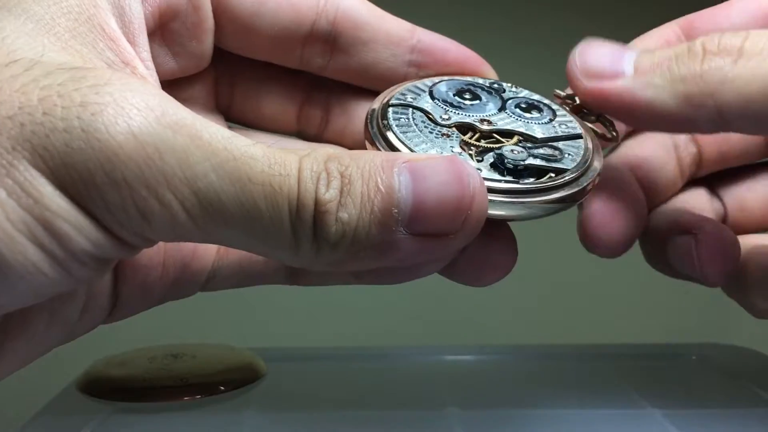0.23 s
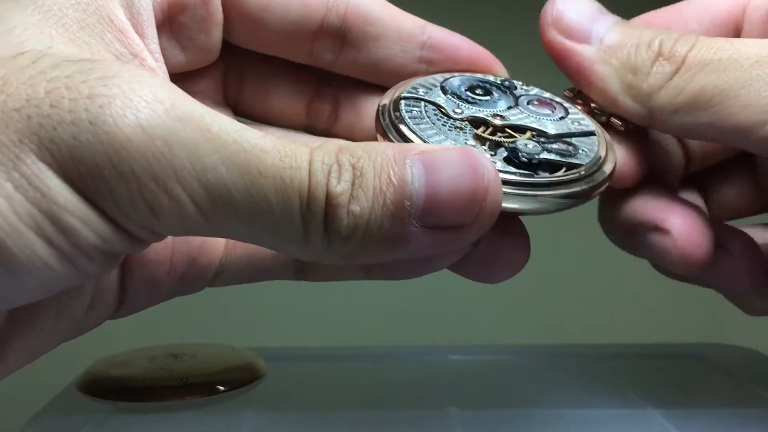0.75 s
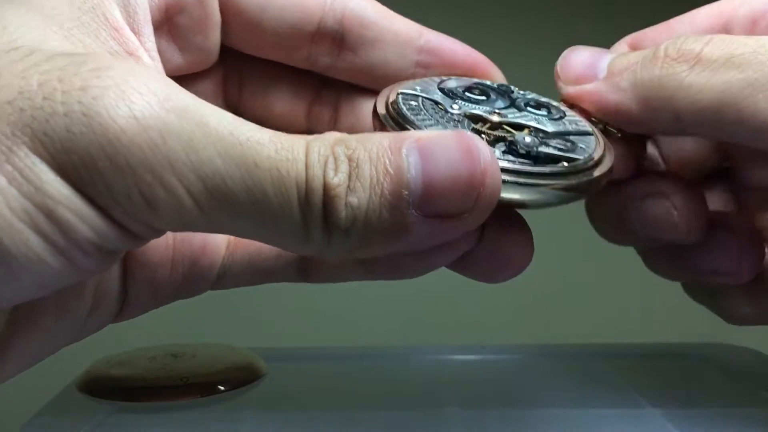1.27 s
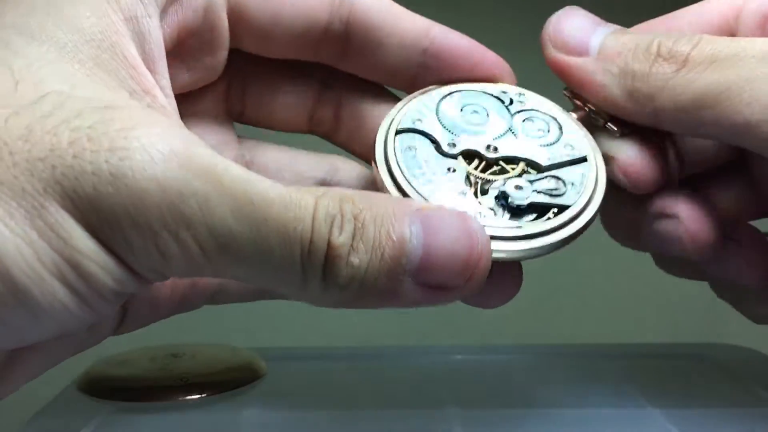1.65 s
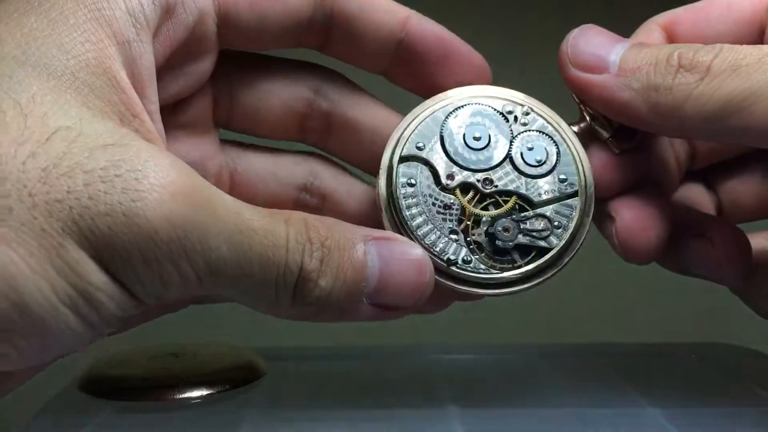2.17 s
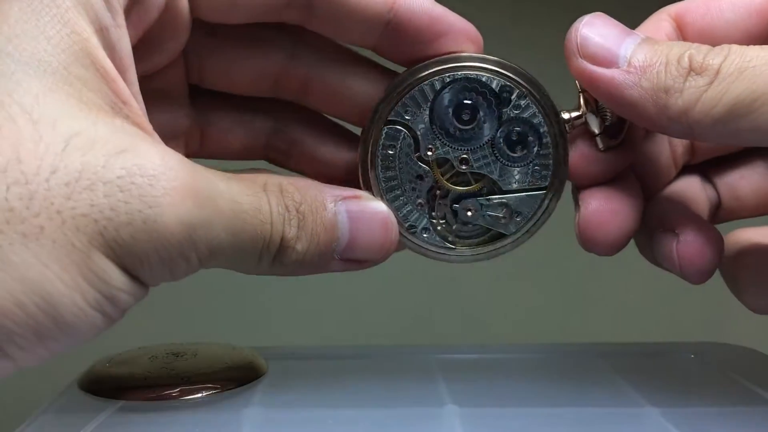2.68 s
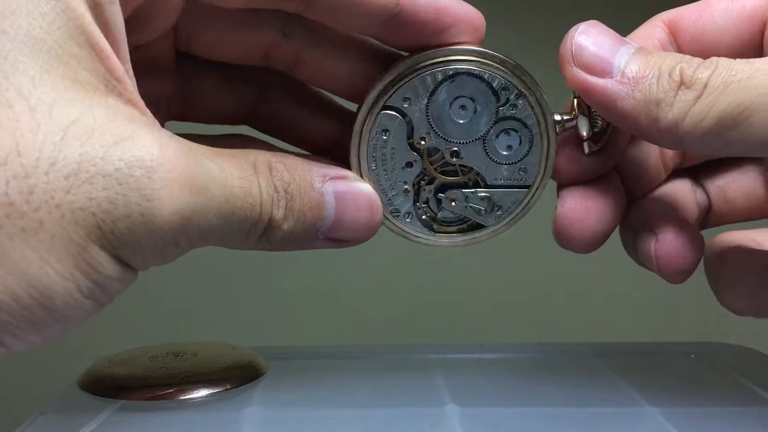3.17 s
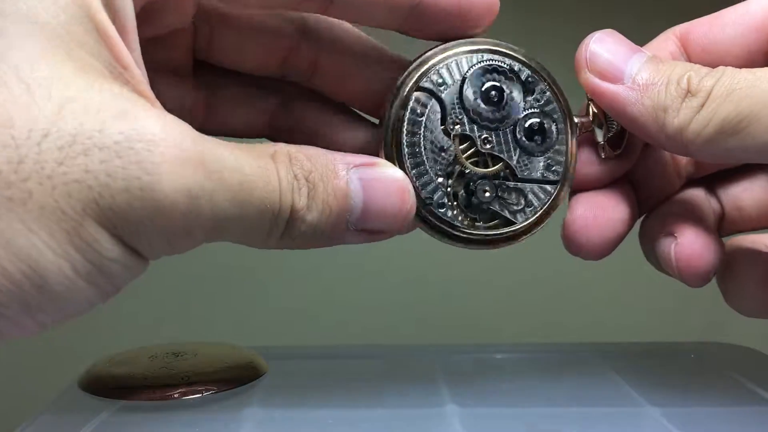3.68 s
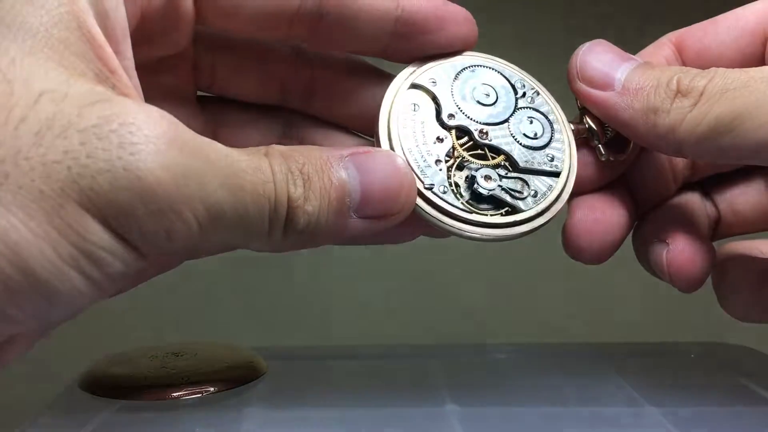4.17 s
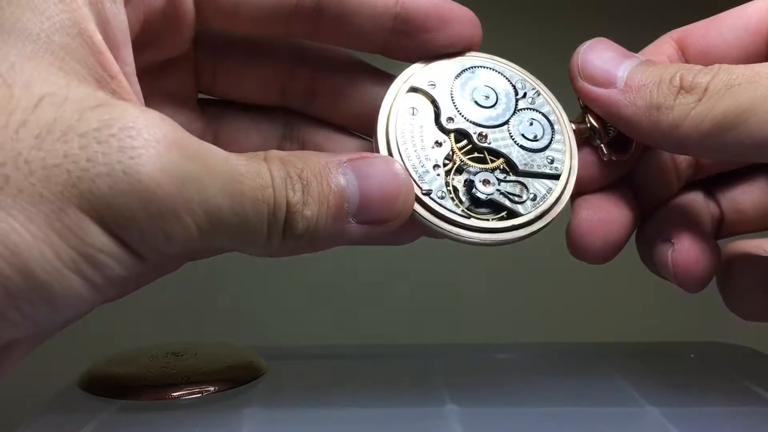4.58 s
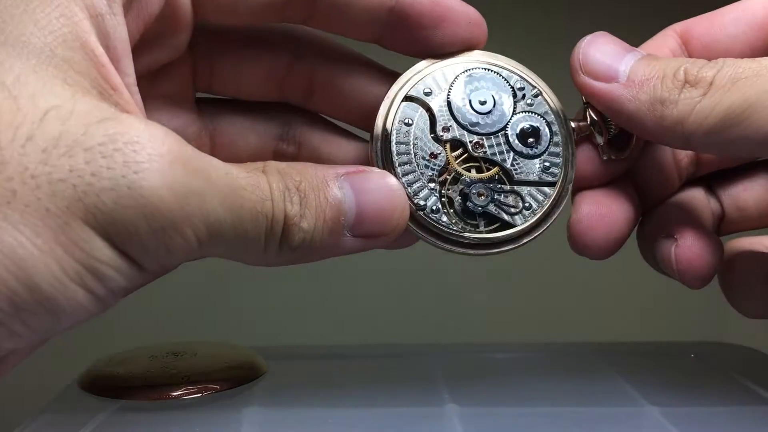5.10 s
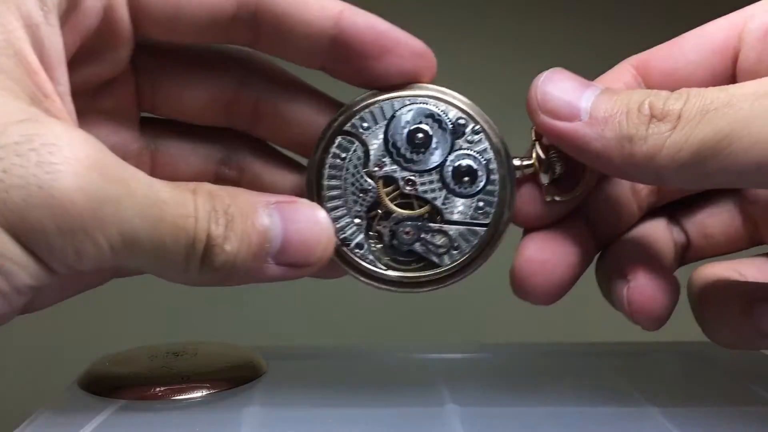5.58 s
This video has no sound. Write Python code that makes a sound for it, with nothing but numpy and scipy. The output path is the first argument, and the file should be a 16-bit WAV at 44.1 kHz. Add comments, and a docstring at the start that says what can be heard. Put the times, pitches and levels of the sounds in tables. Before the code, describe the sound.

A mechanical watch held near the microphone: a few clicks at the start, a six-tooth-long ratchet burst at half a second, light clinks of the loose bow around one second, a longer, denser zip of clicks at about 1.3 seconds. Then steady thin ticking, about five and a half a second, over soft indoor rumble and intermittent hiss.

```python
"""In a quiet room, close to the microphone, an open pocket watch is wound and turned in the hands.
Three crown turns snap a pawl over ratchet teeth; the escapement beats 5.5 times a second.
Struck metal is summed damped modes plus a noise crack; a loose bow clinks, wheels sing on.
Skin rubs in noise grains and slips in dull ticks. Behind: filtered-noise room tone, hum, whine, gated hiss."""
import sys
import numpy as np
from scipy import signal
from scipy.fft import rfft, irfft
from scipy.io import wavfile
from scipy.ndimage import uniform_filter1d

SR = 44100
rng = np.random.default_rng(int(sys.argv[2]) if len(sys.argv) > 2 else 0)


def waveform_to_disk(signal):
    """Save audio, clipped to [-1, 1], as 16-bit WAV at the path in sys.argv[1]."""
    frames = np.transpose(np.atleast_2d(signal))
    scaled = np.clip(frames, -1, 1) * 32767
    samples = np.round(scaled).astype(np.int16)
    wavfile.write(sys.argv[1], SR, samples)


N = 257544

# Crown turns, even speed between points:
# t/s, ratchet teeth passed, click level/dB before trim, brightness/dB, finger rub/dB
SHORT_TURN = [(.0162, 0, -34.5, 0, -58.5), (.0638, 2, -32.5, .5, -62)]
STEADY_TURN = [(0.5189, 0, -32, 0.5, -64), (.539, 1, -32, 0.5, -66.5), (.575, 3, -31.3, 2, -58),
               (.6158, 5, -31.5, 1, -63), (0.631, 6, -34, 0, -63), (.689, 9, -34.5, -2.5, -57)]
LAST_TURN = [(1.269, 0, -33, .5, -67), (1.289, 1, -32, 0.15, -58), (1.358, 5, -33.5, -1.7, -63),
             (1.4064, 7, -34.5, -2.2, -55.5), (1.5025, 11, -34.5, -.5, -60), (1.5356, 12, -32, 1.3, -61)]
# Modes of plates and case:
# f/Hz, level/dB under first turns, level/dB under last turn, level/dB under escapement, level/dB under bow
WATCH_MODES = [(1000,-23.5,-25,-32.5,-20), (1867,-19.5,-14,-22.5,-1), (2432,-21.5,-22,-23.5,-5),
               (2974,-16,-13.5,-24.5,-13), (3430,-19.5,-14.5,-20,-3), (3804,-15.5,-15.5,-17,-11.5),
               (4260,-19.5,-8.5,-20,-7), (4550,-8.5,-15.5,-14,-27), (5030,-10.5,-17,-22,-11.5),
               (5450,-10.5,-7.5,-13.5,-1), (5910,-8.5,-12,-12,-3), (6450,-21,-9.5,-9.5,0),
               (6900,-13,-6,-9.5,-6.5), (7520,-22,-8.5,-11.5,0), (8165,-2,-5.5,-8,0.5),
               (8550,3.5,-1.5,-15.5,-12), (8760,-0.5,-13,-7,6), (9300,-3,-3,-4.5,-1.5),
               (9770,-6,-5.5,-12.5,-1.5), (10220,-6,-14,-12,-3), (10870,-7,-6,-16,-8),
               (11480,-4,-3,-8.5,-1.5), (11980,-2.5,1,-8,-4), (12330,-10,0,4,-10.5), (12960,0,3.5,3.5,1),
               (13370,6.5,-8,-3,-7), (14000,-9,-0.5,-5,-4.5), (14680,-7,-4.5,-18,-2.5),
               (14500,-8,-2,-24,-10), (15430,-2.5,3.5,-5,-17)]
# Lightly damped steel wheels: f/Hz, t60/s, gain at resonance/dB before send
WHEEL_MODES = [(4270, 0.045, 0), (8100, 0.05, -6), (12700, 0.041, -11), (12790, 0.046, -11)]
# Skin on the knurled crown, dull rub and fine creak: f/Hz, level/dB
RUB_SPECTRUM = [(80, -30), (180, 7.5), (380, -2), (700, -16), (1400, -10), (1750, -10.5), (2000, 0.5),
                (2250, -7), (2700, -18.5), (6000, -28)]
# Uneven balance as the watch is tilted: t/s, lag/ms, limp/ms (delays ticks, hastens tocks)
BALANCE_DRIFT = [(.35, -5.5, 4.5), (.75, 1, -1), (2.0, .8, 0.6), (2.4, -.7, -0.5), (2.8, -.6, 1.5),
                 (3.28, 3.5, 0), (3.7, -2.8, 0), (4.2, -0.7, 0.2), (4.7, -2.5, 1.1), (5.1, -3, 2.2),
                 (5.66, -4.5, 3.5)]
# Escapement as the watch is turned about:
# t/s, beat level/dB before trim, touch level/dB before trim, brightness/dB
TICKING = [(.22, -52.5, -64, -21), (.8, -57.5, -64, -7), (1.65, -57, -67, -6), (1.9, -51.5, -62, -1),
           (2.35, -50.5, -64, 0), (2.65, -51.5, -59.5, -2), (3.1, -54, -59.5, -3), (3.7, -53.5, -61.5, -1),
           (4.25, -51.5, -62, 1), (4.8, -52, -59, 1), (5.7, -50.5, -59, 4.5)]
# Ping on the ticks as the watch is tilted: t/s, level/dB
PING = [(3.4, -19), (3.7, 8), (4.4, 4), (5.3, -20)]
# Bow and crown knocking under the fingers: t/s, level/dB, brightness/dB, body/dB
CLINKS = [(0.323, -44, 5.5, -3.5), (0.4147, -42.5, 6.5, -5.5), (0.4604, -35, 7.5, -6),
          (0.8399, -44, 3.5, 3), (0.8798, -57, -11, 9), (1.0053, -48.5, 3.5, -3), (1.0998, -45.5, -2, -1)]
# Fingertip slipping on the case: t/s, f/Hz, level/dB
SLIPS = [(.054, 1910, -52), (.2125, 1960, -60.5), (.2995, 1980, -57), (0.389, 1710, -54), (.395, 1430, -52),
         (0.8391, 900, -52), (1.101, 1530, -53.5), (1.153, 730, -63), (1.262, 940, -59.5),
         (1.314, 1090, -56.5), (1.485, 2070, -57), (1.491, 1000, -58.5)]
# Room rumble, air and microphone hiss: f/Hz, mean density/dB per Hz
ROOM_TONE = [(20, -97), (38, -89), (52, -79), (63, -72.5), (80, -81.5), (105, -81.5), (145, -80.5),
             (180, -88.5), (245, -96), (350, -98.5), (600, -105), (1400, -110.3), (3000, -115.8),
             (8000, -119), (15000, -124.2)]
# Mains hum: f/Hz, level/dB about which it wavers
HUM = [(61, -65), (120, -62)]
# Faint whine swelling and dying away: peak t/s, level/dB
WHINES = [(.73, -67.5), (2.88, -75.5), (5.84, -81)]
# Microphone hiss let through by the gate: f/Hz, density/dB per Hz before trim
HISS = [(100, -112), (300, -94), (600, -99.5), (1100, -102.0), (2000, -103.0), (4000, -104.0),
        (6000, -105.1), (9000, -107.9), (12500, -109.7), (14000, -111.1)]
# Colour of the wall reflections, and rumble share of the room tone: f/Hz, gain/dB
WALL_COLOUR = [(300, -1.5), (2000, 2.0), (5000, 3.5), (9000, -1), (15000, -0.5)]
RUMBLE_SHARE = [(300, 0), (1200, -20)]

# Columns of WATCH_MODES by place struck
FIRST_GRIP, LAST_GRIP, PALLET, BOW = 1, 2, 3, 4
GRAZE_S = .0012
WINDING_TRIM_DB, TICKING_TRIM_DB, HISS_TRIM_DB = 0.8, -0.85, -0.6
RUB_RISE_DB_PER_S, RUB_FALL_DB_PER_S = 502, 252
RESTING_RUB_DB, LET_GO_S = -73.5, 1.9  # fingers stay lightly on the crown until they let go
FIRST_BEAT_S, BEAT_S = .0437, .18135
TICK_LEAD_S, TOCK_LEAD_S = .056, .0477  # unlocking touch before the beat
ACCENT_DB_PER_MS = 0.54  # with limp, ticks gain and tocks lose level
TICK_BRIGHT_DB, TOUCH_BRIGHT_DB = 2.5, -5  # ticks +, tocks -; touches duller still
UPRIGHT_START_S, UPRIGHT_END_S = 2.85, 3.75
IMPULSE_LEAD_S, IMPULSE_PRETRIM_DB = .017, -69
PING_HZ = 8150
WHINE_HZ, WHINE_RISE_DB_PER_S, WHINE_FALL_DB_PER_S = 1326, 170, 65
GATE_OPEN_DB, GATE_HOLD_S, TOP_HZ = -38.5, .405, 15900


def winding():
    """The spring-loaded pawl snaps over the ratchet teeth."""
    first = blows(teeth(SHORT_TURN) + teeth(STEADY_TURN), drive=FIRST_GRIP,
                  ring_t60_s=0.012, crack_db=-0.5, crack_t60_s=0.0091,
                  rebound_db=-5, rebound_s=.0012, scatter_db=5)
    last = blows(teeth(LAST_TURN), drive=LAST_GRIP,
                 ring_t60_s=0.011, crack_db=0.0, crack_t60_s=0.011,
                 rebound_db=-5.0, rebound_s=0.0015, scatter_db=3.5)
    return undb(WINDING_TRIM_DB) * (first + last)


def teeth(turn):
    """One click (t/s, level/dB, brightness/dB) per tooth passing the pawl."""
    s, passed, db, bright_db, _ = np.transpose(turn)
    passed = np.round(passed)
    return [[np.interp(tooth, passed, column) for column in (s, db, bright_db)]
            for tooth in np.arange(passed[-1] + 1)]


def rubbing():
    """Skin sticks and slips on the crown in dense, uneven grains: follows each turn, rests lightly between."""
    t = np.arange(N) / SR
    grip = undb(RESTING_RUB_DB + swell(t, 0, LET_GO_S, RUB_RISE_DB_PER_S, RUB_FALL_DB_PER_S))
    for turn in (SHORT_TURN, STEADY_TURN, LAST_TURN):
        envelope_db = swell(t, turn[0][0], turn[-1][0], RUB_RISE_DB_PER_S, RUB_FALL_DB_PER_S)
        grip = np.maximum(grip, undb(follow(turn, t)[-1] + envelope_db))
    struck = rng.random(N) < 1200 / SR  # 1200 grains/s
    grains = struck * rng.standard_normal(N) * undb(4.1 * walk(70))
    return unit(colour(grains, RUB_SPECTRUM)) * grip


def escapement():
    """Each balance swing: light rattling touch, then a sharper beat as the escape wheel lands on a pallet."""
    touch_rows, beat_rows = swings()
    touches = blows(touch_rows, drive=PALLET, ring_t60_s=0.0046, crack_db=-11.5, crack_t60_s=0.0074,
                    rebound_db=1.0, rebound_s=.0015, scatter_db=6.0)
    beats = blows(beat_rows, drive=PALLET, ring_t60_s=0.017, crack_db=-4.5, crack_t60_s=0.0051,
                  rebound_db=-5.5, rebound_s=.0013, scatter_db=2)
    ticks = undb(TICKING_TRIM_DB) * (touches + beats)
    ping = colour(ticks, peak(PING_HZ, inner=1.05, outer=1.2))
    return ticks + ping * undb(follow(PING, np.arange(N) / SR)[0])


def swings():
    """The balance swings to and fro: touches and beats as (t/s, level/dB, brightness/dB)."""
    due = np.arange(FIRST_BEAT_S, N / SR + BEAT_S, BEAT_S)
    side = np.where(np.arange(len(due)) % 2, 1, -1)  # tick +1, tock -1
    lag_ms, limp_ms = follow(BALANCE_DRIFT, due)
    beat_db, touch_db, bright_db = follow(TICKING, due)
    lands = due + (lag_ms + side * limp_ms) / 1000
    unlocks = lands - np.where(side > 0, TICK_LEAD_S, TOCK_LEAD_S)
    accent_db = side * limp_ms * ACCENT_DB_PER_MS
    touches = np.column_stack([unlocks, touch_db + accent_db, bright_db + TOUCH_BRIGHT_DB])
    touches = touches[unlocks > GRAZE_S]
    # watch held upright: the fork clicks once more just before each tock
    impulses = [(s - IMPULSE_LEAD_S, IMPULSE_PRETRIM_DB, 0) for s in lands[side < 0]
                if UPRIGHT_START_S < s < UPRIGHT_END_S]
    beats = np.column_stack([lands, beat_db + accent_db, bright_db + side * TICK_BRIGHT_DB])
    return [*touches, *impulses], beats[due < N / SR]


def handling():
    """The loose bow clinks on the pendant; skin slips on the case with soft, dull ticks."""
    clinks = blows(CLINKS, drive=BOW, ring_t60_s=0.0051, crack_db=0.0, crack_t60_s=0.024,
                   rebound_db=-8.5, rebound_s=0.0014, scatter_db=3.0)
    slips, t = np.zeros(N), np.arange(SR // 30) / SR
    for s, hz, db in SLIPS:
        # soft flesh gives no treble
        flesh = [(hz / 4, -40), (hz / 2, -15), (hz, 0), (hz * 2, -18), (hz * 4, -55)]
        skin = colour(rng.standard_normal(len(t)), flesh)
        slip = np.sin(2 * np.pi * hz * t) + 1.68 * unit(skin)
        add(slips, s, slip * fade(t, 0.019) * np.minimum(t / 0.00071, 1), db)
    return clinks + slips


def blows(rows, **contact):
    """Clicks from a table; a harder contact is brighter, a heavier one has more body."""
    out = np.zeros(N)
    phase = rng.random(len(WATCH_MODES))
    for s, db, bright_db, *body in rows:
        body_db = sum(body)  # 0 if no body column
        tone = [(800, 0), (1600, body_db), (2800, body_db), (4200, 0), (9500, 0), (12000, bright_db)]
        add(out, s - GRAZE_S, colour(click(phase=phase, **contact), tone), db)
    return out


def click(drive, ring_t60_s, crack_db, crack_t60_s, rebound_db, rebound_s, scatter_db, phase):
    """Steel grazes, hits, rebounds twice; each contact rings the modes and a dense, quickly damped crack."""
    columns = np.transpose(WATCH_MODES)
    hz, db = columns[0], columns[drive]
    t = np.arange(SR // 30) / SR - GRAZE_S  # main hit at t = 0
    t60 = ring_t60_s * (9000 / hz[:, None]) ** 0.42  # high modes die sooner
    spectrum = [(300, db[0] - 7.5), *zip(hz, db)]  # so small a body radiates little bass
    # delay/s, force/dB
    contacts = [(-GRAZE_S, -22), (0, 0),
                (rebound_s * rng.uniform(0.622, 1.3), rebound_db),
                (rebound_s * rng.uniform(2.1, 2.6), 2 * rebound_db)]
    out = 0
    for delay, force_db in contacts:
        age = t - delay
        sizes = undb(db + scatter_db * rng.standard_normal(len(hz)))[:, None] / np.sqrt(t60)
        # main hit lands on much the same spot, the others anywhere; phase in cycles
        offset = phase + (.16 if delay == 0 else 1) * rng.standard_normal(len(hz))
        waves = np.sin(2 * np.pi * (hz[:, None] * age + offset[:, None]))
        ring = np.sum(sizes * fade(age, t60) * waves, axis=0)
        crack = colour(rng.standard_normal(len(t)), spectrum) * fade(age, crack_t60_s)
        attack = np.clip(age / 0.0003, 0, 1)
        out = out + undb(force_db) * attack * (unit(ring) + undb(crack_db) * unit(crack))
    return out


def wheels(x):
    """Long, faint ring that blows wake in the wheels: damped sines scaled to their gain at resonance."""
    t = np.arange(SR // 5) / SR
    ring = 0
    for hz, t60, db in WHEEL_MODES:
        scale = undb(db) * 2 * np.log(1000) / (t60 * SR)
        ring = ring + scale * fade(t, t60) * np.sin(2 * np.pi * hz * t)
    return signal.fftconvolve(x, ring)[:N]


def room(x, tail_db, tail_t60_s, echo_db, echo_s):
    """Small room: scattered wall echo and short tail, as coloured decaying noise."""
    t = np.arange(SR // 2) / SR
    tail = rng.standard_normal(len(t)) * fade(t - .004, tail_t60_s)
    echo = rng.standard_normal(len(t)) * fade(t - echo_s, 0.016)
    response = (undb(tail_db) * unit(tail) + undb(echo_db) * unit(echo)) / np.sqrt(len(t))
    return signal.fftconvolve(x, colour(response, WALL_COLOUR))[:N]


def background():
    """Heaving low rumble under steady air, wavering mains hum and a faint, airy narrow-band whine."""
    t = np.arange(N) / SR
    hum = 0
    for hz, db in HUM:
        level = undb(db + 2.35 * walk(9)) * np.sqrt(2)
        hum = hum + level * np.sin(2 * np.pi * hz * t + 0.26 * walk(6))
    whine = unit(noise(peak(WHINE_HZ, inner=1.08, outer=1.25)))
    whine = whine * sum(undb(db + swell(t, s, s, WHINE_RISE_DB_PER_S, WHINE_FALL_DB_PER_S))
                        for s, db in WHINES)
    tone = noise(ROOM_TONE)
    rumble = colour(tone, RUMBLE_SHARE)
    air = tone - rumble
    return air + rumble * undb(1.43 * walk(4.9)) + hum + whine


def undb(db):
    """Decibels to gain."""
    return 10 ** (np.asarray(db) / 20)


def unit(x):
    """Scale to rms 1."""
    return x / np.sqrt(np.mean(x ** 2))


def colour(x, points):
    """Filter by (f/Hz, gain/dB) points, interpolated over log frequency."""
    hz, db = np.transpose(points)
    f = np.maximum(np.fft.rfftfreq(len(x), 1 / SR), 1)
    gain = undb(np.interp(np.log(f), np.log(hz), db))
    return irfft(rfft(x) * gain, len(x))


def peak(hz, inner, outer):
    """Band-pass points: -5 dB at the inner frequency ratio, -40 dB from the outer."""
    return [(hz / outer, -40), (hz / inner, -5), (hz, 0), (hz * inner, -5), (hz * outer, -40)]


def noise(points):
    """Gaussian noise of given density/dB per Hz."""
    return colour(rng.standard_normal(N), points) * np.sqrt(SR / 2)


def walk(rate_hz):
    """Slow random drift, spread near 1: held random steps, smoothed twice."""
    k = int(SR / rate_hz)
    steps = np.repeat(rng.standard_normal(N // k + 1), k)
    return unit(uniform_filter1d(uniform_filter1d(steps, k), k)[:N])


def fade(t, t60_s):
    """Exponential decay starting at t = 0."""
    return (t >= 0) * np.exp(-np.log(1000) * np.maximum(t, 0) / t60_s)


def swell(t, start_s, end_s, rise_db_per_s, fall_db_per_s):
    """Envelope/dB: rises until start, holds, falls after end."""
    return -rise_db_per_s * np.maximum(start_s - t, 0) - fall_db_per_s * np.maximum(t - end_s, 0)


def follow(curve, t):
    """Columns of a control curve at times t."""
    s, *columns = np.transpose(curve)
    return [np.interp(t, s, column) for column in columns]


def add(out, s, sound, db):
    """Mix in a short sound; level is its energy spread over 10 ms."""
    i = int(s * SR)
    sound = sound * undb(db) * np.sqrt(SR / 100 / np.sum(sound ** 2))
    out[i:i + len(sound)] += sound[:max(len(out) - i, 0)]


def scene():
    """The watch in the hands, in its room; blows wake the wheels, ticks reach the walls 2 dB weaker."""
    hands = winding() + handling() + rubbing()
    ticks = escapement()
    hands = hands + undb(-5.0) * wheels(hands)
    ticks = ticks + undb(-5.0) * wheels(ticks)
    walls = room(hands + undb(-2.0) * ticks, tail_db=-17.0, tail_t60_s=0.21, echo_db=-31.0, echo_s=0.014)
    return (hands + ticks + walls + background())[None]


def record(dry):
    """Hiss gate starts open, reopens on loud clicks and holds briefly; an elliptic low-pass cuts the top."""
    loud = uniform_filter1d(dry[0] ** 2, SR // 100) > undb(GATE_OPEN_DB) ** 2
    loud[0] = True
    held = signal.fftconvolve(loud * 1., np.ones(int(GATE_HOLD_S * SR)))[:N] > .5
    gate = uniform_filter1d(held * 1., SR // 100)
    hiss = noise(HISS) * undb(HISS_TRIM_DB) * gate
    low_pass = signal.ellip(8, .2, 70, TOP_HZ, fs=SR, output="sos")
    return signal.sosfilt(low_pass, dry + hiss)


dry = scene()
out = record(dry)
waveform_to_disk(out)
```